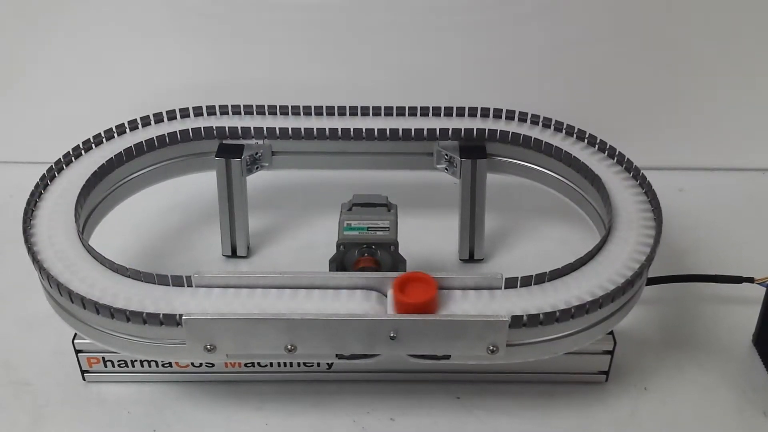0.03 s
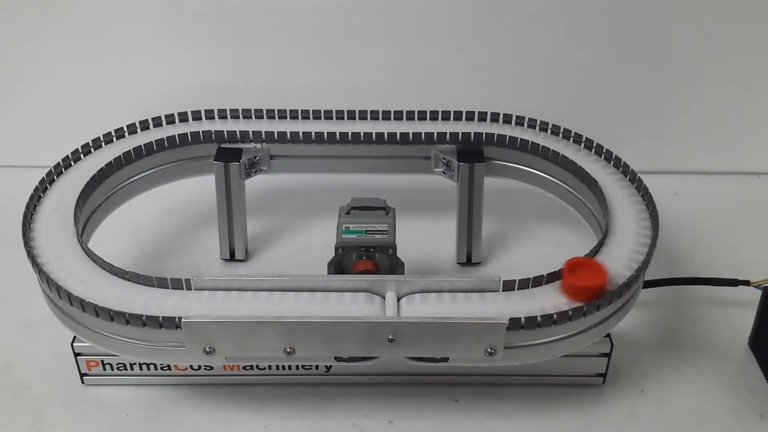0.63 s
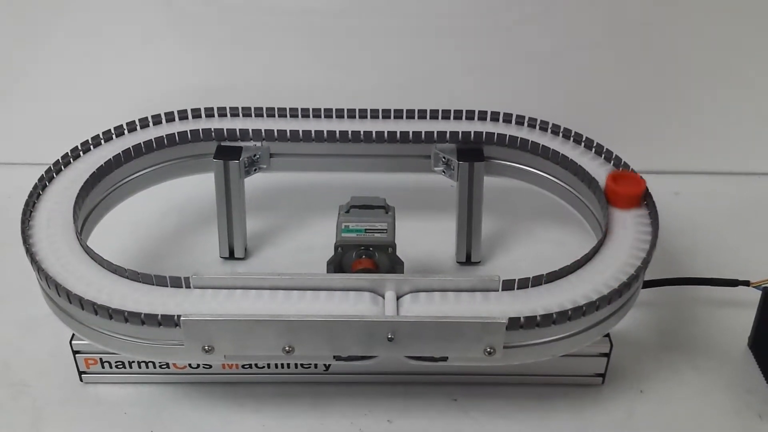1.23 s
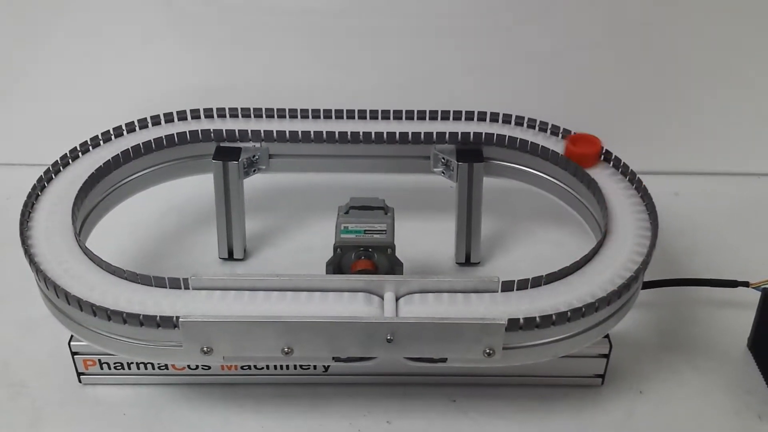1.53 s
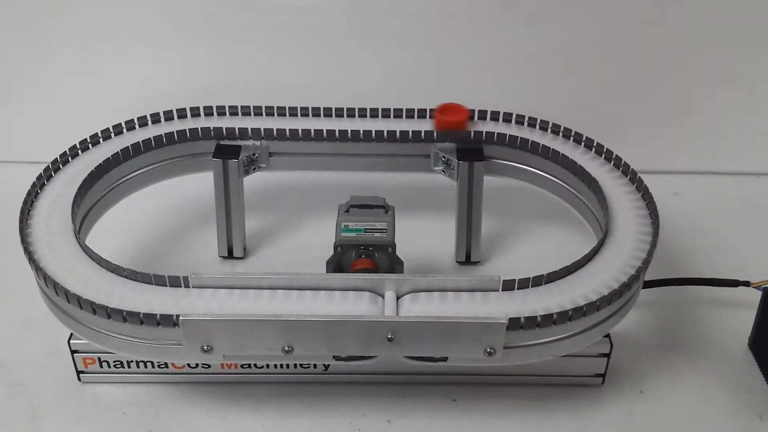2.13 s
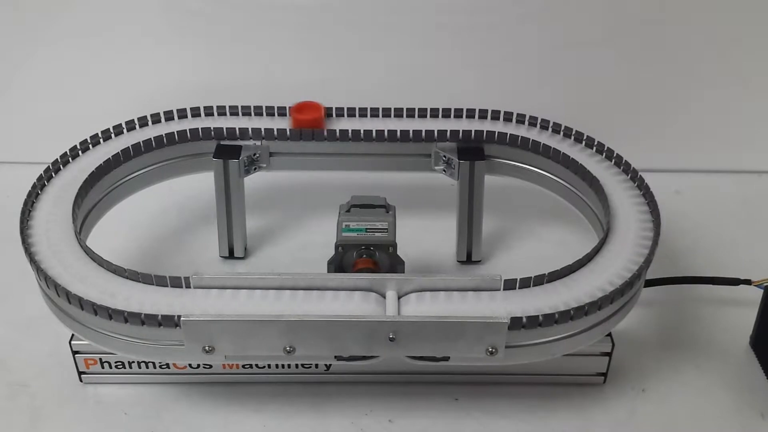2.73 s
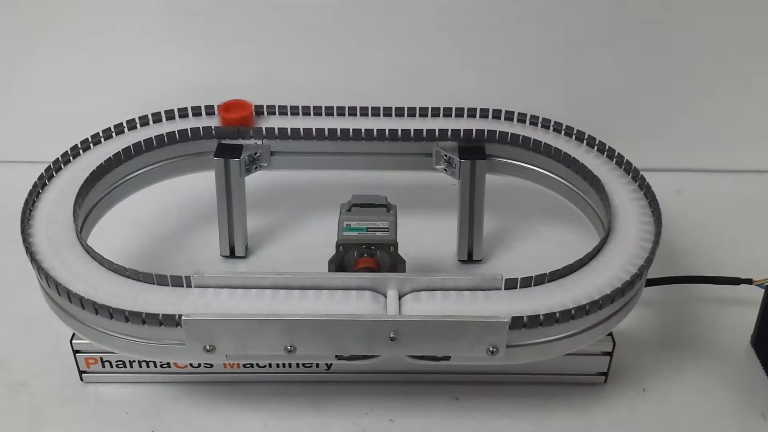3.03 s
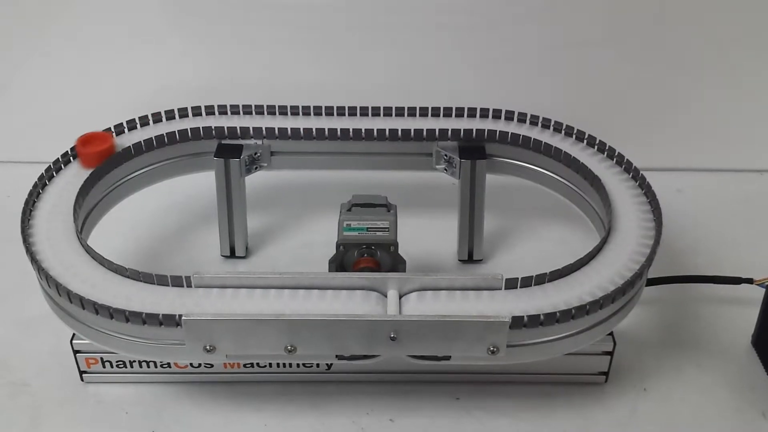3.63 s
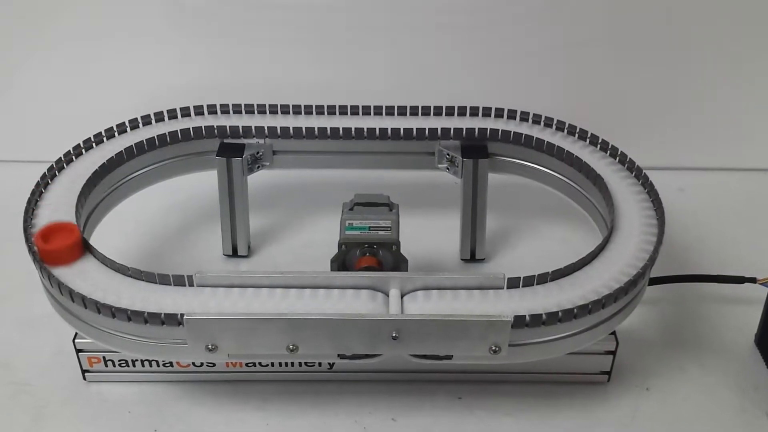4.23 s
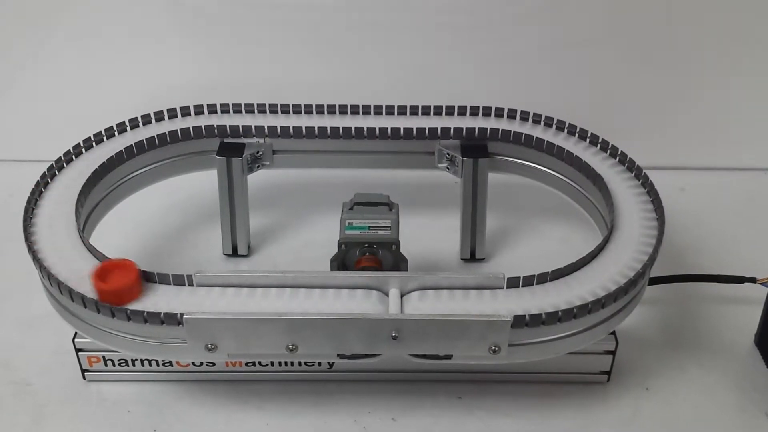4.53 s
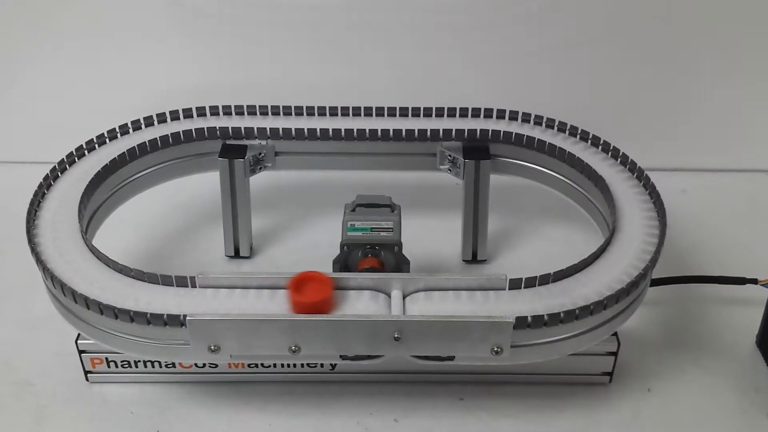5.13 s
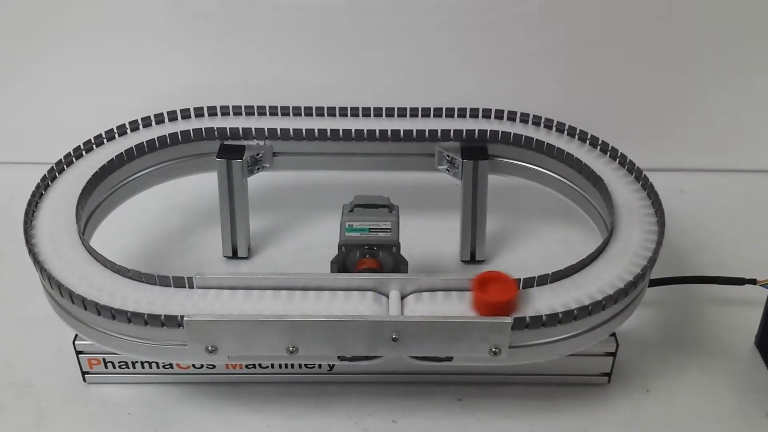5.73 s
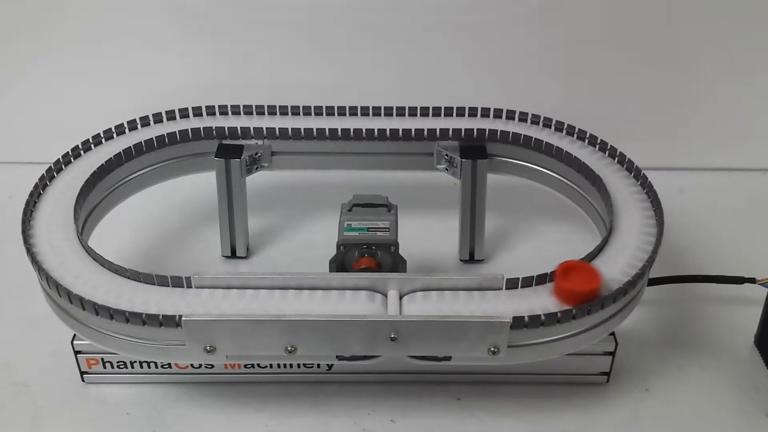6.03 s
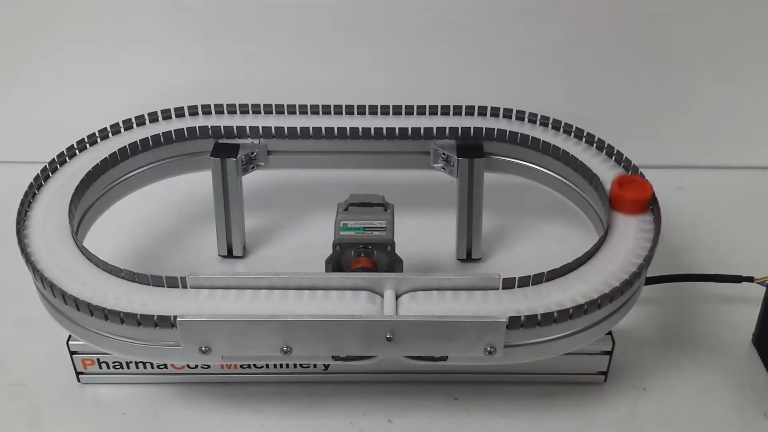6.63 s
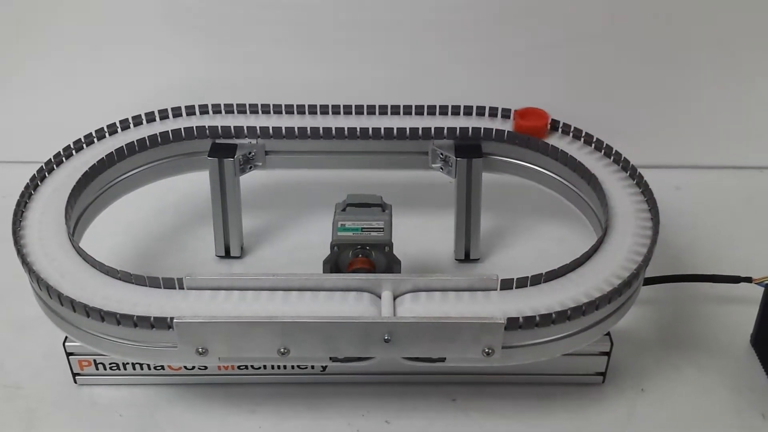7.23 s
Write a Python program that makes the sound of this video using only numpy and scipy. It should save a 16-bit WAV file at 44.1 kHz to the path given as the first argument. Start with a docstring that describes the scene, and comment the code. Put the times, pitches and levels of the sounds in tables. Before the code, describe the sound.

Plastic links of a tabletop conveyor tick quickly and evenly over a rubbing hiss and soft motor whine, with a couple of late knocks.

```python
"""Bright, rapid ticking over a steady hiss: a small tabletop conveyor, close to one microphone in a
quiet room. Its plastic chain carries a puck round an oval aluminium track. Every link goes through
the same run of contacts at the drive sprocket and seats with a tick, some with a louder snap.
Behind that the chain rubs along its guides, the motor hums and whines, and the frame rumbles faintly.
Late on, the puck scrapes over the drive and the track gives two hollow knocks."""
import sys
import numpy as np
from scipy import signal
from scipy.fft import rfft, irfft
from scipy.io import wavfile

SR = 44100
rng = np.random.default_rng(int(sys.argv[2]) if len(sys.argv) > 2 else 0)


def wav_out(sig):
    """Save sig, one row per channel (or a flat mono array), as 16-bit PCM at SR to the path in sys.argv[1]."""
    wavfile.write(sys.argv[1], SR, np.round(np.clip(np.atleast_2d(sig).T, -1, 1) * 32767).astype(np.int16))


N = 321930

LINK_S, FIRST_LINK_S = .045, .015   # one link reaches the sprocket every LINK_S
STEP_HZ = 3 / LINK_S   # three motor steps to a link
MOTOR_ORDERS = [2, 3, 7, 10, 12, 105, 115, 230]   # the motor's tones, in multiples of the step rate
# Strength of those tones. Each entry: level in dB.
MOTOR_LEVELS_DB = [-46, -51, -56, -61.5, -75, -41, -51.5, -69]
# Rise and fall of the lowest hum. Each row: time in seconds, dB above its usual level.
HUM_CURVE = [(0, 0), (2.1, 0), (2.5, 3.5), (3.0, -2.5), (3.22, -7), (3.4, 0), (4.1, -1.5), (4.9, 2.5),
             (7.3, -2.5)]
# Swells of low rumble. Each row: centre in seconds, width in seconds, peak level in dB.
RUMBLE_SWELLS = [(3.106, 0.063, -36), (4.99, 0.063, -39), (5.10, 0.027, -41), (5.403, 0.025, -41),
                 (6.541, 0.078, -40)]
# Tone colour of each noise. Each row: frequency in Hz, relative spectral density in dB.
RUMBLE_SPECTRUM = [(20, -32), (40, -31), (55, -8), (70, -5.5), (95, -4), (140, 0), (175, -2), (230, 1.5),
                   (330, 0), (480, -7), (600, -14), (1000, -11), (2500, -39)]
SWELL_SPECTRUM = [(20, -22), (45, -8), (70, -1), (140, -2), (215, 6), (300, -3), (450, -10), (900, -38),
                  (3000, -69)]
SLIDE_SPECTRUM = [(400, -20.5), (650, -17.5), (1100, -12.5), (1600, -3.5), (2000, -7), (2500, 2.5),
                  (3200, -17), (4200, -9), (5500, -1.5), (6800, 3.5), (7700, -12.5), (10000, -20),
                  (12500, -41), (15500, -56)]
KNOCK_SPECTRUM = [(100, -17), (250, 4), (450, 2.5), (750, -10), (1400, 0), (2200, -0.5), (4000, -6.5),
                  (8000, -6), (14000, -42)]
SCRAPE_SPECTRUM = [(1500, -16), (4500, -2), (6000, 7), (7200, 0), (9000, -7), (11000, -23), (15000, -39)]
RAIL_SPECTRUM = [(500, -35.5), (1000, -11.5), (1400, -13.5), (1650, -3), (2000, -5), (2450, 3),
                 (2750, -6.5), (3100, -13.5), (4500, -24.5), (9000, -41)]
CLACK_SPECTRUM = [(500, -27.5), (1100, -13.5), (1600, -1), (2500, -7), (3500, 0), (4200, 0), (5700, -2.5),
                  (7000, -4), (8000, -13), (10500, -26), (15500, -43)]
CRACK_SPECTRUM = [(1500, -17), (4300, -8), (5700, 7), (6600, 4.5), (7800, -0.5), (9300, -9.5), (10500, -13),
                  (12500, -23), (15500, -28)]
# Resonances of the aluminium track. Each row: frequency in Hz, width in Hz, boost in dB.
TRACK_MODES = [(1313, 36, 4.5), (1560, 44, 5.5), (1757, 500, 6), (2320, 200, 4), (2625, 60, 6),
               (2725, 150, 8), (2994, 175, 4.5), (3204, 170, 6), (3550, 96, 5.5), (3730, 210, 6),
               (4630, 180, 2), (4816, 160, 5), (6330, 66, 7.5), (7084, 173, 8), (8950, 330, 3),
               (10300, 160, 5)]
# Knocks on the track. Each row: start in seconds, level in dB, decay in seconds,
# hollow pitch in Hz, its width in Hz, its boost in dB.
TRACK_KNOCKS = [(5.3819, -15, 0.009, 1150, 394, 3.5), (6.995, -30, 0.038, 636, 596, 15)]
# Notes of a sprocket tooth. Each row: seconds into the link's cycle, pitch in Hz, level in dB.
TOOTH_NOTES = [(.0095, 3650, -35), (0.0112, 2970, -28.5), (.0215, 3676, -31)]
# Links that snap in loudest. Each row: start in seconds, relative level in dB, pitch in Hz.
LOUD_SNAPS = [(0.126, -4.5, 5950), (0.3066, -0.5, 6320), (0.4422, -5, 5700), (0.4816, -3.5, 6030),
              (0.936, -4.5, 5580), (1.0264, -4, 6130), (1.206, -7, 6100), (1.611, -4, 6300),
              (1.7919, -2, 5880), (2.33, -5.5, 5730), (2.4224, -4.5, 6120), (2.506, -5.5, 6140),
              (2.737, -3, 6330), (3.0059, -3, 5930), (3.0513, -4.5, 6300), (3.5908, -3.5, 5740),
              (5.2696, -4, 5800), (5.3131, -6, 6000), (5.324, -5.5, 6300), (5.3464, -4, 5760),
              (5.6605, -3, 5960), (5.886, -1, 6200), (6.0218, -3, 5860), (6.1522, -2.5, 6130),
              (6.6993, -6, 6300), (6.788, -5, 6180), (7.1404, -1.5, 6120)]
# Contacts of one link at the sprocket. Each row: delay into the cycle, timing scatter and decay in
# seconds, then relative levels of rail, clack, link ring and crack in dB.
LINK_CONTACTS = [(.0073, 0.00033, 0.0047, -28.5, -27, -24.5, -33),
                 (.0108, 0.0011, 0.0022, -26.5, -27.5, -22, -37),
                 (0.015, 0.0011, 0.0024, -27, -26.5, -14.5, -35),
                 (0.0203, 0.00036, 0.0024, -32.5, -21.5, -16, -23),
                 (0.0234, 0.00063, 0.0031, -30, -36.5, -17, -32.5),
                 (0.031, 0.00036, 0.0051, -32.5, -35, -27, -31),
                 (0.035, 0.0014, 0.011, -28.5, -37.5, -24.5, -31)]


def from_db(db):
    """Decibels to gain."""
    return 10 ** (np.asarray(db) / 20)


def unit_power(x):
    """Scale to an RMS of one."""
    return x / np.sqrt(np.mean(x ** 2) + 1e-20)


def bump(centre_s, width_s):
    """A bell-shaped rise and fall."""
    return np.exp(-.5 * ((np.arange(N) / SR - centre_s) / width_s) ** 2)


def drift(rate):
    """A random wander of unit power, turning about `rate` times a second."""
    return unit_power(np.interp(np.arange(N) / SR * rate, np.arange(4096), rng.standard_normal(4096)))


def chance_rows(rows, count, limit=2):
    """Rows of normal random values, held within the limit."""
    return np.clip(rng.standard_normal((count, rows)).T, -limit, limit)


def colour(x, spectrum, resonances=(), size=4096):
    """Filter of unit power gain: a broad spectrum with resonant peaks on it."""
    hz = np.maximum(np.fft.rfftfreq(size, 1 / SR), 1)
    points_hz, points_db = np.transpose(spectrum)
    db = np.interp(np.log(hz), np.log(points_hz), points_db)
    for centre, width, boost in resonances:
        db = db + boost / (1 + (2 * (hz - centre) / width) ** 2)
    cepstrum = irfft(np.log(from_db(db)))[:size // 2]
    response = irfft(np.exp(rfft(2 * cepstrum, size)))   # minimum phase: nothing sounds early
    return signal.fftconvolve(x, response / np.linalg.norm(response))[:N]


def grit(spread_db):
    """Noise of dense tiny impacts, uneven in size."""
    return unit_power(rng.standard_normal(N) * from_db(spread_db * np.clip(drift(550), -2.5, 2.5)))


def blows(times, gains, decay_s):
    """Force that jumps at each time and dies away."""
    kicks, at = np.zeros(N), np.round(times * SR).astype(int)
    inside = (at >= 0) & (at < N)
    np.add.at(kicks, at[inside], gains[inside])
    return signal.lfilter([1], [1, -np.exp(-1 / (max(decay_s, 1e-4) * SR))], kicks + 1e-18)


def pings(times, level_db, ring_hz, decay_s=.00046, bounce_s=.0011, bounce_db=0, count=4, size=400):
    """A struck part pings `count` times: first at its own pitch, then in uneven, detuned bounces."""
    out, age = np.zeros(N), np.arange(size) / SR
    envelope = np.e * age / decay_s * np.exp(-age / decay_s)
    for bounce in range(count):
        late, detune, force = rng.standard_normal((len(times), 3)).T
        start = times + bounce * bounce_s * np.exp(.3 * late)
        hz = ring_hz + 260 * detune * (bounce > 0)
        gain = from_db(level_db + bounce * bounce_db + 2 * force * (bounce > 0))
        tones = gain[:, None] * envelope * np.sin(2 * np.pi * hz[:, None] * age)
        at = np.round(start * SR).astype(int)[:, None] + np.arange(size)
        inside = (at >= 0) & (at < N)
        np.add.at(out, at[inside], tones[inside])
    return out


def room(x, t60_s=.11, wet_db=-11.5, first_echo_s=.00267, size=16384):
    """Table and near walls send a short, diffuse tail to the microphone after the direct sound."""
    age = np.arange(size) / SR
    tail = rng.standard_normal(size) * from_db(-60 * age / t60_s) * (age > first_echo_s)
    return x + from_db(wet_db) * signal.fftconvolve(x, tail / np.linalg.norm(tail))[:N]


def frame_rumble(level_db=-43):
    """The running chain shakes frame and table; now and then a deeper rumble swells."""
    steady = from_db(level_db) * colour(rng.standard_normal(N), RUMBLE_SPECTRUM)
    swell = sum(from_db(db) * bump(centre_s, width_s) for centre_s, width_s, db in RUMBLE_SWELLS)
    return steady + swell * colour(rng.standard_normal(N), SWELL_SPECTRUM)


def motor(waver_db=2, slip_s=.000005, waver_rad=.35):
    """Wavering hum and whine locked to the steps; the load makes the rotor lead and lag."""
    t = np.arange(N) / SR
    steps = STEP_HZ * (t + slip_s * drift(7.7))
    tones = []
    for order, db in zip(MOTOR_ORDERS, MOTOR_LEVELS_DB):
        amplitude = np.sqrt(2) * from_db(db + waver_db * drift(19))
        phase = 2 * np.pi * (order * steps + rng.random()) + waver_rad * drift(25)
        tones.append(amplitude * np.sin(phase))
    hum_db = np.interp(t, *np.transpose(HUM_CURVE))
    return tones[0] * from_db(hum_db) + sum(tones[1:])


def chain_hiss(pull_db, level_db=-26, pull_share=.96):
    """The whole chain rubs along its guides, louder as the pull rises."""
    rubbing = colour(grit(spread_db=1.5), SLIDE_SPECTRUM, TRACK_MODES)
    return from_db(level_db + pull_share * pull_db) * rubbing


def track_knocks():
    """Short rattles of the track, each with a hollow resonance of its own."""
    out = 0
    for start_s, db, decay_s, *hollow in TRACK_KNOCKS:
        force = blows(np.array([start_s]), from_db([db]), decay_s) * grit(spread_db=-1)
        out = out + colour(force, KNOCK_SPECTRUM, TRACK_MODES + [hollow])
    return out


def puck_scrape(centre_s=5.287, width_s=.043, level_db=-23.5):
    """A short, gritty hiss as the puck rides over the drive."""
    rubbing = colour(grit(spread_db=9), SCRAPE_SPECTRUM, TRACK_MODES)
    return from_db(level_db) * bump(centre_s, width_s) * rubbing


def tooth_rings(cycles, scatter_s=.0005, uneven_db=2.5, spread_hz=45):
    """Every link strikes the same short, clear notes from a sprocket tooth."""
    out = 0
    for delay_s, hz, db in TOOTH_NOTES:
        late, force, detune = chance_rows(3, len(cycles))
        times = cycles + delay_s + scatter_s * late
        out = out + pings(times, db + uneven_db * force, hz + spread_hz * detune,
                          decay_s=.0015, count=1, size=900)
    return out


def link_snaps(cycles, ring_hz, spread_hz, chance=.35, seat_s=.0217, scatter_s=.00083):
    """Time, relative level and pitch of links that snap as they seat: loud ones, softer ones by chance."""
    chosen = rng.random(len(cycles)) < chance
    late, force, detune = chance_rows(3, len(cycles))
    times = cycles + seat_s + scatter_s * late
    soft_db = -7.5 + .6 * force
    soft_snaps = np.column_stack([times, soft_db, ring_hz + spread_hz * detune])
    clear_of_loud = np.abs(times[:, None] - np.transpose(LOUD_SNAPS)[0]).min(axis=1) > LINK_S / 2
    return np.vstack([LOUD_SNAPS, soft_snaps[clear_of_loud & chosen]]).T


def sprocket(pull_db, ring_hz=6020, spread_hz=230, ring_trim_db=-4.5, snap_trim_db=-3.5,
             uneven_db=3, ring_uneven_db=4.5, crack_uneven_db=3.5, sway_db=1.35,
             rail_lag_s=.0013, crack_lag_s=.0007, crack_decay_s=.0052):
    """Each contact shakes the rail, clacks on the teeth and sets the link ringing with a bright crack."""
    cycles = FIRST_LINK_S + LINK_S * np.arange(-1, N / SR / LINK_S)   # each link's start in seconds
    link_pull_db = np.interp(cycles * SR, np.arange(N), pull_db)
    snap_s, snap_db, snap_hz = link_snaps(cycles, ring_hz, spread_hz)
    rings = pings(snap_s, snap_db + snap_trim_db, snap_hz, decay_s=.00053, bounce_s=.0018, bounce_db=-6)
    rail = clack = crack = 0
    for delay_s, scatter_s, decay_s, rail_db, clack_db, link_db, crack_db in LINK_CONTACTS:
        late, force, rub, ping, detune, edge = chance_rows(6, len(cycles), limit=1.6)
        times = cycles + delay_s + scatter_s * late
        rail = rail + blows(times + rail_lag_s, from_db(rail_db + uneven_db * rub), decay_s)
        clack = clack + blows(times, from_db(clack_db + link_pull_db + uneven_db * force), decay_s)
        crack_gain = from_db(crack_db + link_pull_db + crack_uneven_db * edge)
        crack = crack + blows(times + crack_lag_s, crack_gain, crack_decay_s)
        gentle = np.abs(times[:, None] - snap_s).min(axis=1) > .003   # a link either settles or snaps
        ring_db = np.where(gentle, link_db + ring_trim_db + link_pull_db + ring_uneven_db * ping, -100)
        rings = rings + pings(times, ring_db, ring_hz + spread_hz * detune)
    sway = from_db(sway_db * drift(9))   # the chain wanders sideways, pressing harder or softer
    impacts = ((rail * sway, RAIL_SPECTRUM), (clack * sway, CLACK_SPECTRUM), (crack, CRACK_SPECTRUM))
    teeth = tooth_rings(cycles)
    clatter = sum(colour(hit * grit(spread_db=1), spectrum, TRACK_MODES) for hit, spectrum in impacts)
    return rings + teeth + clatter


def scene():
    """Chain, frame and motor in mono, from close by the table."""
    pull_db = .43 * drift(rate=4)   # the pull on the chain wanders about its mean
    contacts = sprocket(pull_db) + track_knocks() + puck_scrape()
    return (room(contacts) + chain_hiss(pull_db) + frame_rumble() + motor())[None]


def record(dry):
    """The microphone signal is cut steeply above 15.5 kHz."""
    return signal.sosfilt(signal.ellip(12, .1, 80, 15500, fs=SR, output="sos"), dry)


dry = scene()
out = record(dry)
wav_out(out)
```